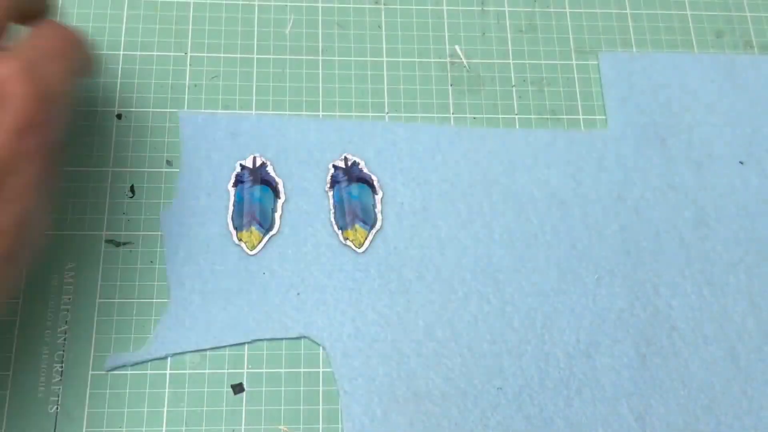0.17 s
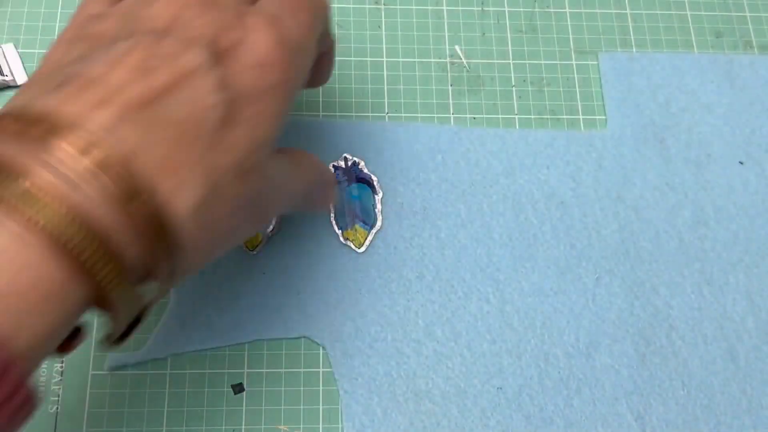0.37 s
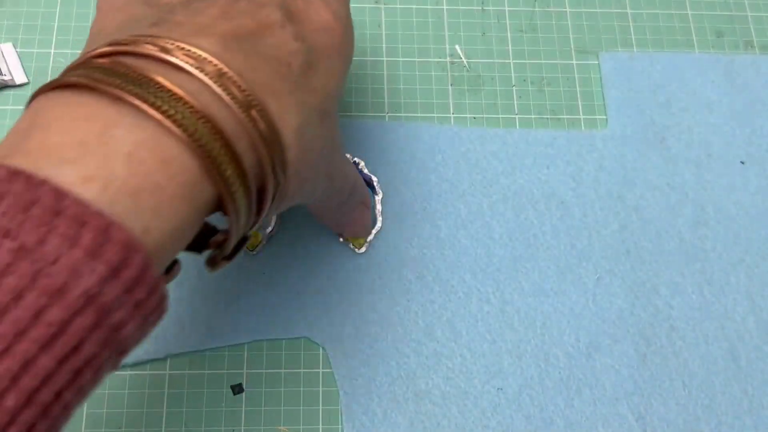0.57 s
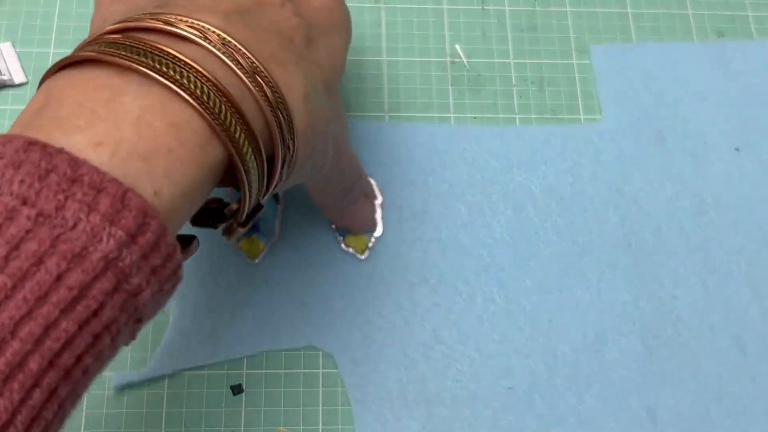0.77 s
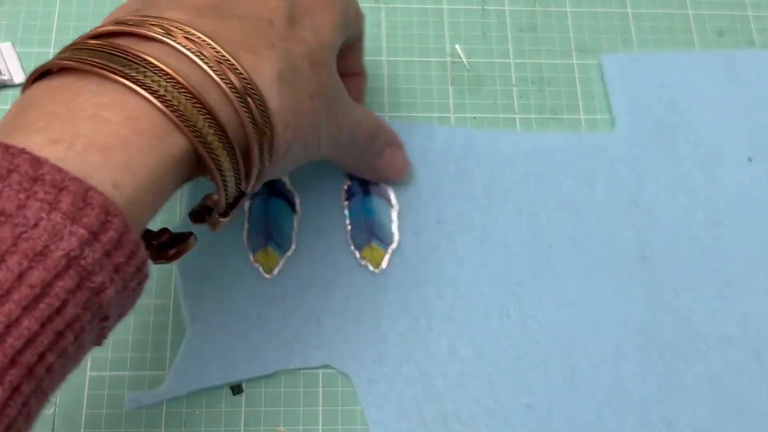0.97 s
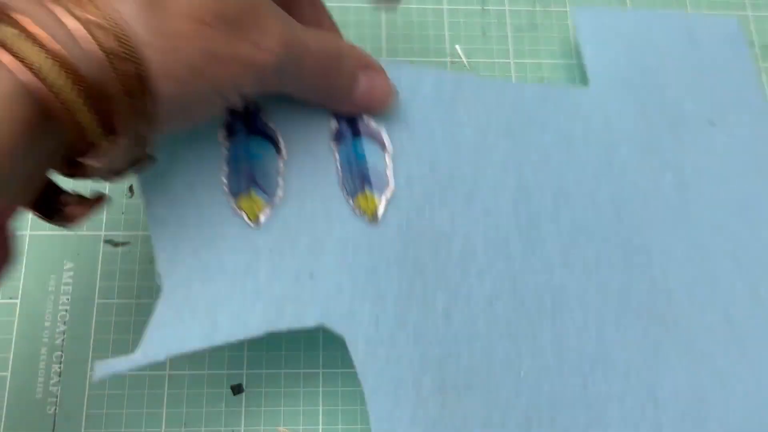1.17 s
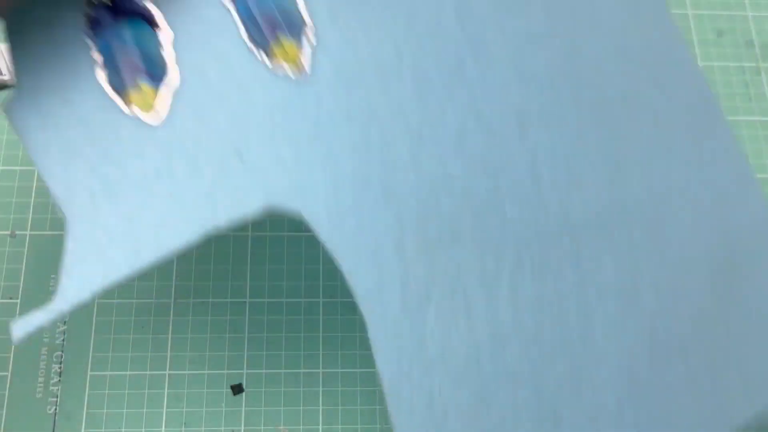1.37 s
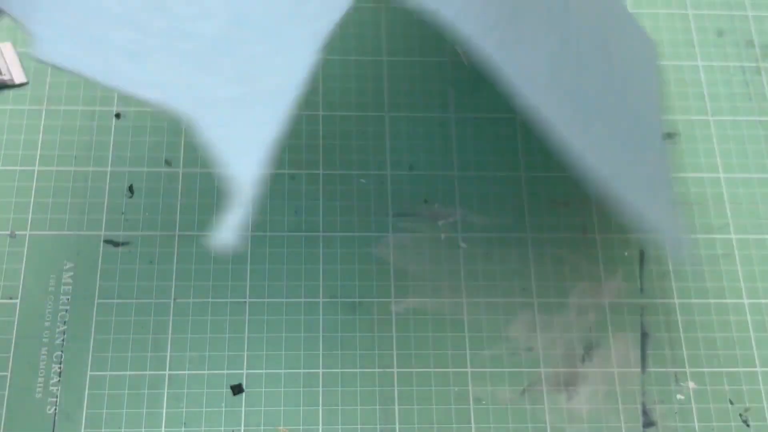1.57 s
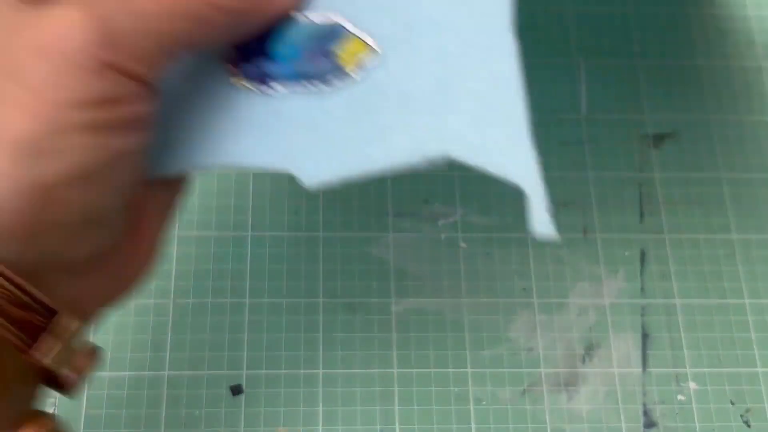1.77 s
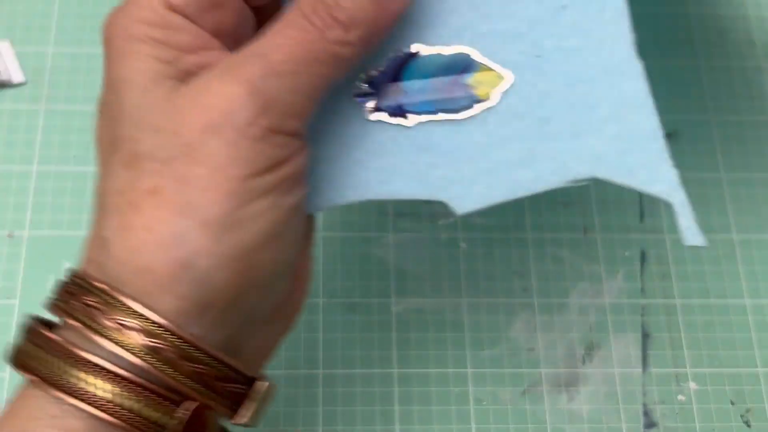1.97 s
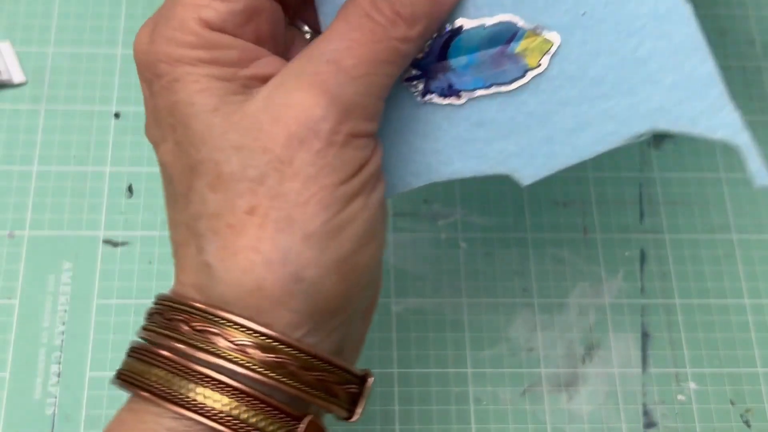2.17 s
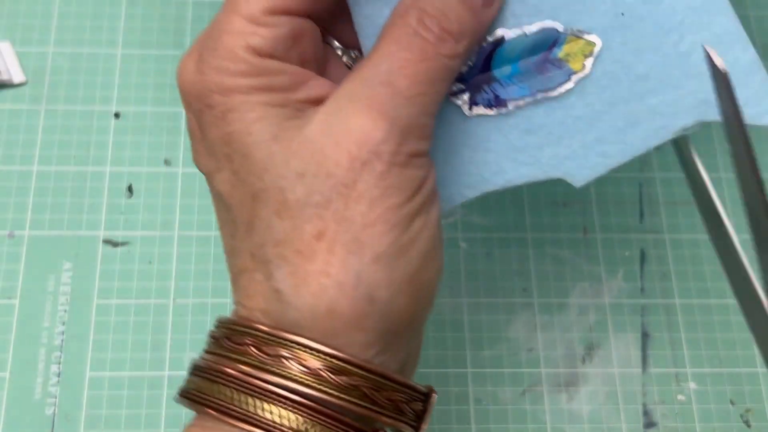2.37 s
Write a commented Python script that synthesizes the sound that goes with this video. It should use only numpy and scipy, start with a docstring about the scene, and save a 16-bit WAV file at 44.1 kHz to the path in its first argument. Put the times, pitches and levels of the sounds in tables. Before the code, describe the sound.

A hard bangle clack, then faint pats and swishes of a felt sheet picked off a mat

```python
"""Felt sheet off a cutting mat

Small room, microphone close to the mat, a low room tone swaying underneath.
Bangles clack and tick as the arm reaches in: damped sine modes with a noise crack, and resonant noise bursts.
Fingers pat the felt (low falling sines with noise puffs), and it slides off the mat in swells of noise.
The lifted sheet scuffs and flaps as it is gripped again: more short noise bursts, and a faint rustle."""
import sys
import numpy as np
from scipy import signal
from scipy.fft import rfft, irfft, next_fast_len
from scipy.io import wavfile
from scipy.ndimage import map_coordinates

SR = 44100
rng = np.random.default_rng(int(sys.argv[2]) if len(sys.argv) > 2 else 0)


def wav_record(signal):
    """Record a signal, one row per channel, as 16-bit PCM in the file named by sys.argv[1]."""
    frames = np.transpose(np.atleast_2d(signal))
    bounded = np.clip(frames, -1, 1)
    # unit amplitude maps onto the largest positive 16-bit level
    quanta = np.round(bounded * 32767).astype(np.int16)
    wavfile.write(sys.argv[1], SR, quanta)


N = 106457  # samples in the scene


def amp(db):
    """Gain from dB."""
    return 10 ** (np.asarray(db) / 20)


def unit(x):
    """Scaled to rms 1."""
    return x / np.sqrt(np.mean(x ** 2) + 1e-20)


def along(points, hz):
    """Value at hz, interpolated over log frequency from (f/Hz, value) points."""
    f, v = np.transpose(points)
    return np.interp(np.log(hz + 1), np.log(f + 1), v)


def level(rows):
    """Gain per sample from (t/s, level/dB) rows, practically silent outside them."""
    s, db = np.transpose(rows)
    return amp(np.interp(np.arange(N) / SR, s, db, left=-120, right=-120))


def wobble(rate):
    """A smooth random curve, rate knots a second."""
    knots = rng.standard_normal(int(N * rate / SR) + 4)
    return map_coordinates(knots, [np.arange(N) * rate / SR])


def filtered(x, gain):
    """x times a gain that depends on frequency."""
    n = x.shape[-1]
    m = next_fast_len(n + 4096)  # padded against wrap-around
    return irfft(rfft(x, m) * gain(np.fft.rfftfreq(m, 1 / SR)), m)[..., :n]


def shape(points):
    """Colour from (f/Hz, level/dB) points."""
    return lambda hz: amp(along(points, hz))


def bump(centre_hz, octaves):
    """Colour of one broad resonance."""
    return lambda hz: 1 / (1 + (np.log2((hz + 1) / centre_hz) / octaves) ** 2) ** 1.29


# stereo width at the microphone: f/Hz, side over mid level/dB
STEREO_WIDTH = [(60, -18.5), (290, -9.5), (640, -5.5), (1400, 1), (2200, -9), (3500, -16), (5500, -15.5),
                (8000, -1), (15000, -1)]


def noise(gain, size=N):
    """Stereo noise with the given colour, its mid at rms 1."""
    def mid_side_gain(hz):
        return gain(hz) * np.array([np.ones_like(hz), amp(along(STEREO_WIDTH, hz))])

    mid, side = filtered(rng.standard_normal((2, size)), mid_side_gain)
    return np.array([mid + side, mid - side]) / mid.std()


def skew(hz):
    """Phase of a direct sound at the left and right microphone ports, in radians."""
    return np.arctan(amp(along(STEREO_WIDTH, hz))) * np.array([[1], [-1]])


def direct(gain, size=N):
    """Noise from one close spot: both ports hear the same wave, shifted in phase."""
    mono = noise(gain, size=size).mean(0)
    return filtered(mono, lambda hz: np.exp(1j * skew(hz)) / np.cos(skew(hz)))


def add(track, s, sound):
    """Mixes a short sound into the track at time s."""
    part = track[:, round(s * SR):][:, :sound.shape[-1]]
    part += sound[..., :part.shape[1]]


FLOOR_DB, FLOOR_SWAY_DB = -68, 3
# colour of the room at rest: f/Hz, level/dB
FLOOR_COLOUR = [(20, -9), (40, 1.5), (65, 4), (110, -3), (200, -3.5), (350, -10), (700, -15.5), (1400, -17),
                (2500, -29.5), (5000, -38.5), (9000, -47), (15000, -39.5)]


def room_tone():
    """Low background of the room, coloured noise with a swaying level."""
    return amp(FLOOR_DB + FLOOR_SWAY_DB * wobble(14)) * noise(shape(FLOOR_COLOUR))


TICK_RISE_S, TICK_HOLD_S = 0.00035, 0.0008  # a contact grates briefly before it dies
# light ticks and taps of bangles, fingers and stiff felt:
# t/s, level/dB, centre f/Hz, width/octaves, t60/s
TICKS = [(.0508, -37.5, 5560, 1.9, 0.011), (.052, -43, 515, 0.47, 0.065), (.0592, -37, 6630, 5.4, 0.013),
         (.06, -50, 518.4, 1.6, 0.14), (0.1497, -37.5, 5680, 0.95, .018), (.299, -48, 1225, 0.21, 0.022),
         (.3208, -52.5, 11000, 2.4, 0.013), (.448, -60.5, 1680, 0.58, 0.023),
         (.452, -51.5, 297.3, 0.46, 0.043), (.613, -68.5, 13000, 0.46, .008),
         (.896, -57, 2005, 1.35, 0.018), (.898, -49, 290, .45, .04), (1.1112, -43, 620, 1.2, 0.014),
         (1.1114, -48, 11000, 1, .008), (1.381, -59, 490, 0.49, 0.06), (1.851, -43, 9000, 5.6, 0.0096),
         (1.9195, -59, 8000, 0.77, 0.011), (1.941, -37, 4850, 0.19, 0.026),
         (1.941, -32.5, 6740, 0.22, 0.0072), (1.9444, -38.5, 6200, 1.1, 0.019),
         (2.0291, -40, 1543, 0.069, 0.03), (2.0294, -53, 3330, 0.96, 0.014), (2.036, -53, 2420, 1.5, 0.02),
         (2.135, -47.5, 7280, 1.8, 0.0173), (2.22, -53, 6920, 0.45, 0.014)]


def ticks():
    """Each tick is a sharp noise burst coloured by a resonance of its own."""
    out, t = np.zeros((2, N)), np.arange(SR // 8) / SR
    for s, db, hz, octaves, t60 in TICKS:
        decay_db = -60 * np.maximum(t - TICK_HOLD_S, 0) / t60
        envelope = (1 - np.exp(-t / TICK_RISE_S)) * amp(db + decay_db)
        add(out, s, envelope * direct(bump(hz, octaves), size=len(t)))
    return out


# how long the room rings: f/Hz, t60/s
ROOM_T60 = [(100, 0.83), (500, 0.46), (2000, 0.43), (5000, 0.48), (9000, 0.16), (15000, .3)]


def diffuse(colour):
    """A diffuse noise tail, each frequency dying at its own speed."""
    hz, t, z = signal.stft(noise(colour, size=SR // 2), SR, nperseg=256)
    decay = amp(-60 * t / along(ROOM_T60, hz)[:, None])
    return signal.istft(z * decay, SR, nperseg=256)[1]


ROOM_DELAY_S, NEAR_WET_DB, ECHO_DB = 0.006, -8, -38
ECHO_GRAIN_DB = 1.5  # separate reflections make the tail uneven
# the room's colour on the small close sounds: f/Hz, level/dB
ROOM_COLOUR = [(100, -14), (350, -5), (1000, -2.5), (1550, -9.5), (3500, -8.5), (5500, -8), (8000, -8.5),
               (14000, -9)]
# colour of the room's answer to the clack: f/Hz, level/dB
CLACK_ECHO = [(100, -11.5), (350, -3), (700, -0.5), (950, -4), (1350, -7.5), (1780, 0.5), (2100, -3.5),
              (3400, -8.5), (4500, -14), (8300, -23.5), (11000, -23), (14500, -26)]


def room(near):
    """The walls smear the small close sounds by convolution and answer the clack with its own tail."""
    out = np.zeros((2, N))
    tail = diffuse(np.ones_like)
    tail = filtered(tail / np.linalg.norm(tail.mean(0)), shape(ROOM_COLOUR))
    near_mono = near.mean(0)[None]
    add(out, ROOM_DELAY_S, amp(NEAR_WET_DB) * signal.fftconvolve(near_mono, tail, axes=1))
    echo = diffuse(shape(CLACK_ECHO))
    grain_db = ECHO_GRAIN_DB * wobble(350)[:echo.shape[1]]
    add(out, CLACK[0] + ROOM_DELAY_S, echo * amp(ECHO_DB + grain_db))
    return out


CRACK_DB, CRACK_T60_S = -14, 0.0083  # crack level relative to the clack
# the hard clack of the bangles: t/s, level/dB
CLACK = (0.0872, -11.5)
# what the clack rings with: f/Hz, level/dB relative to the clack, t60/s, rise/s
CLACK_MODES = [(228, -15, 0.042, .002), (456, -12, 0.045, 0.0025), (561, -5, 0.032, 0.0024),
               (900, -13, 0.016, .001), (1102, -12, 0.022, 0.0013), (1844, -15.5, 0.049, 0.0017),
               (2160, -7.5, .016, 0.00038), (2850, -1, 0.01, 0.0012), (3510, 0, 0.0061, 0.0001),
               (3960, 1, 0.0055, .0002), (4600, -6.5, 0.0077, .0002), (5130, -17.5, 0.0098, 0.00014),
               (7300, -15, 0.011, .0002), (8060, -10.5, 0.008, 0.0007)]
# colour of the crack: f/Hz, level/dB
CRACK_COLOUR = [(200, -29.5), (2000, -10), (5000, -1.5), (9000, -2), (14000, -3), (16000, -17)]


def clack():
    """One hard contact of the bangles: a bright crack and heavily damped modes, each with its own rise."""
    s, db = CLACK
    t = np.maximum(np.arange(N) / SR - s, 0)  # time since contact
    ring = 0
    for hz, mode_db, t60, rise in CLACK_MODES:
        envelope = amp(mode_db - 60 * t / t60) * (1 - np.exp(-t / rise))
        ring = ring + envelope * np.sin(2 * np.pi * hz * t + skew(hz))
    crack = (t > 0) * amp(CRACK_DB - 60 * t / CRACK_T60_S) * direct(shape(CRACK_COLOUR))
    return amp(db) * (ring + crack)


THUMP_RISE_S, THUMP_PUFF_DB = 0.0021, -6  # puff level relative to the low tone
THUMP_SAG, THUMP_SAG_S = 0.42, 0.0042  # the pitch starts this share higher and drops as the felt yields
# soft thumps of fingers and felt on the mat: t/s, level/dB, settled f/Hz, t60/s
THUMPS = [(0.093, -47.5, 99, 0.22), (0.149, -49.5, 202.6, 0.066), (0.45, -51, 140.4, 0.068),
          (0.597, -51, 116, 0.086), (0.8986, -39, 170, 0.05), (0.909, -45, 78, 0.1),
          (1.109, -42.5, 290, 0.011), (1.114, -48, 116, 0.062), (1.381, -50, 150, 0.019),
          (1.482, -50, 269.6, 0.026), (1.488, -55, 70, 0.11), (1.8812, -32, 101.5, 0.093),
          (1.878, -48, 346.8, 0.27), (1.958, -45.5, 82, 0.11), (2.029, -53, 292, 0.073),
          (2.138, -49.5, 245.7, 0.066)]


def thumps():
    """A low tone of falling pitch and a dull noise puff for each soft contact."""
    out, t = np.zeros((2, N)), np.arange(SR // 4) / SR
    sagging = t + THUMP_SAG * THUMP_SAG_S * (1 - np.exp(-t / THUMP_SAG_S))
    for s, db, hz, t60 in THUMPS:
        tone = np.sin(2 * np.pi * hz * sagging)
        puff = amp(THUMP_PUFF_DB) * noise(bump(hz, octaves=0.79), size=len(t))
        envelope = amp(db - 60 * t / t60) * (1 - np.exp(-t / THUMP_RISE_S))
        add(out, s, envelope * (tone + puff))
    return out


SCUFF_RISE_S, SCUFF_T60_S = 0.00079, 0.017
# scuffs of felt under the fingers: t/s, length before release/s, level/dB, centre f/Hz, width/octaves
SCUFFS = [(0.657, 0.11, -72, 500, 1.8), (0.986, 0.048, -81.5, 2960, 0.67), (1.168, 0.046, -76, 1000, 1.5),
          (1.529, 0.014, -62, 5890, 1.1), (1.619, 0.0327, -64, 900, 1.96),
          (1.761, 0.013, -65.5, 6900, 1.08), (1.811, 0.0153, -53, 3640, 0.57),
          (1.817, 0.013, -57, 13700, 0.27), (1.8689, 0.012, -43, 788, 1.6), (1.872, .014, -45, 390, 0.68),
          (1.8712, 0.0098, -43, 6680, 0.51), (1.885, 0.0784, -61, 840, 0.94)]


def scuffs():
    """Short rubs of resonant noise: attack, hold, release."""
    out, t = np.zeros((2, N)), np.arange(SR // 5) / SR
    for s, length, db, hz, octaves in SCUFFS:
        release_db = -60 * np.maximum(t - length, 0) / SCUFF_T60_S
        envelope = amp(db + release_db) * (1 - np.exp(-t / SCUFF_RISE_S))
        add(out, s, envelope * direct(bump(hz, octaves), size=len(t)))
    return out


PATCH_DB, PATCH_HZ, PATCH_S = 1.5, 756, 0.027  # spread and knot spacing of the patches


def patchy(x):
    """The colour of the rub shifts as new folds touch the mat: random gain over frequency and time."""
    hz, t, z = signal.stft(x, SR, nperseg=256)
    knots = rng.standard_normal((len(hz), len(t)))
    field = map_coordinates(knots, np.meshgrid(hz / PATCH_HZ, t / PATCH_S, indexing="ij"))
    return signal.istft(z * amp(PATCH_DB * field), SR, nperseg=256)[1][:, :N]


SNAGS_PER_S, SNAG_DB, SNAG_S = 70, 1, 0.0007  # mean rate, spike scale over the steady gain, decay time


def snags():
    """Fibres snag and snap free: a gain of 1 with random spikes that die exponentially."""
    spikes = (rng.random(N) < SNAGS_PER_S / SR) * rng.exponential(size=N)
    decay = np.exp(-1 / (SNAG_S * SR))
    return 1 + amp(SNAG_DB) * signal.lfilter([1], [1, -decay], np.minimum(spikes, 2))


SWISH_FLUTTER_DB, SWISH_BED_DB = 1.6, -87
# strokes of felt on the mat and in the hand: peak t/s, time from peak to 1/e of the power/s, level/dB
STROKES = [(0.683, 0.0157, -66), (0.723, 0.011, -75.5), (0.887, 0.046, -63), (1.099, 0.017, -57.5),
           (1.19, 0.038, -65), (1.28, 0.069, -65.5), (1.436, 0.061, -64.5), (1.552, 0.023, -64.5),
           (1.634, 0.022, -57.5), (1.688, 0.056, -68), (1.785, 0.0082, -65.5), (1.839, 0.0235, -58.5),
           (2.33, 0.015, -70)]
# colour of sliding felt: f/Hz, level/dB
SWISH_COLOUR = [(100, -9), (400, -11), (1000, -2.5), (1500, -8.5), (1800, 3.5), (2400, -5), (3100, 3),
                (3800, -0.5), (6500, 4), (8300, 0.5), (11500, 0), (14000, 1.5), (16000, -10.5)]
# faint dull rustle once the sheet is aloft: t/s, level/dB
RUSTLE = [(1.9, -77.5), (2.1, -71), (2.26, -68), (2.41, -75.5)]
# colour of the rustle: f/Hz, level/dB
RUSTLE_COLOUR = [(300, -5.5), (900, -3.5), (2000, 1), (2500, 1), (3100, -9), (5000, -11), (9000, -17)]


def swish():
    """Sliding fibres as uneven noise; each stroke swells and fades with the speed of the felt."""
    t = np.arange(N) / SR
    power = amp(SWISH_BED_DB) ** 2
    for s, half, db in STROKES:
        power = power + amp(db) ** 2 * np.exp(-((t - s) / half) ** 2)
    flutter = amp(SWISH_FLUTTER_DB * wobble(120))
    fibres = unit(patchy(noise(shape(SWISH_COLOUR)) * snags() * flutter))
    rustle = level(RUSTLE) * noise(shape(RUSTLE_COLOUR)) * amp(1.2 * wobble(71))
    return np.sqrt(power) * fibres + rustle


HAND_PAN_DB = 0.5  # left over right: the hand works on the left


def scene():
    """Bangles, hand and felt in the room."""
    near = ticks() + scuffs() + thumps()
    pan = amp(HAND_PAN_DB * np.array([[0.5], [-0.5]]))
    return clack() + pan * (near + swish()) + room(near) + room_tone()


TOP_HZ = 16400
# overall response: f/Hz, level/dB
RESPONSE = [(20, -6), (60, 0.5), (8700, -1.5), (9400, -11), (9950, -25.5), (10500, -8), (11300, -1.5),
            (14700, 0), (15700, -13)]


def record(dry):
    """A narrow notch in the treble, and nothing above TOP_HZ."""
    return filtered(dry, lambda hz: amp(along(RESPONSE, hz)) * (hz < TOP_HZ))


dry = scene()
out = record(dry)
wav_record(out)
```